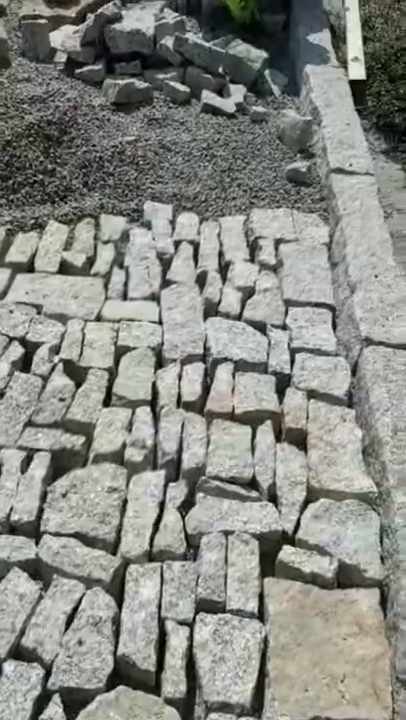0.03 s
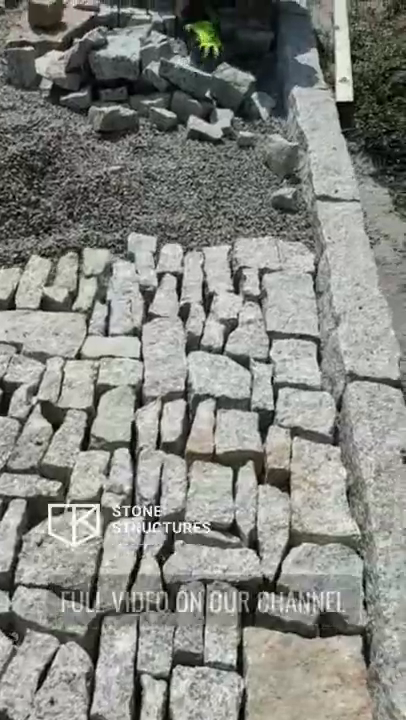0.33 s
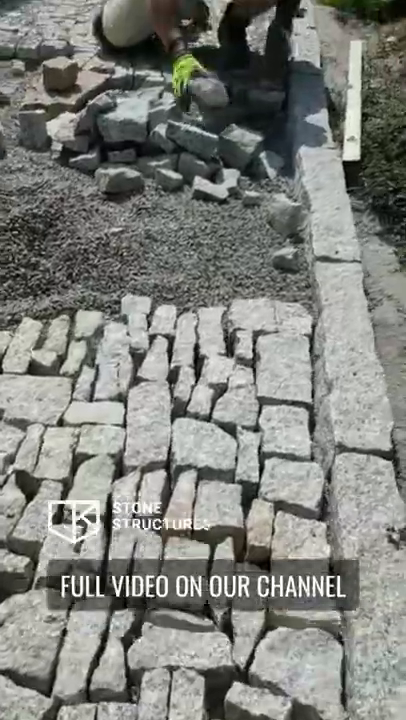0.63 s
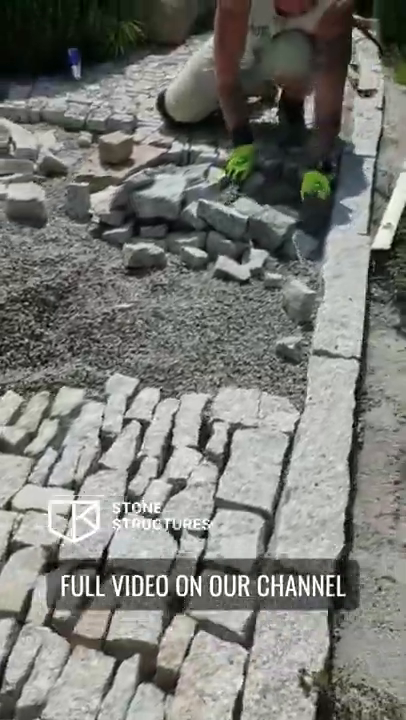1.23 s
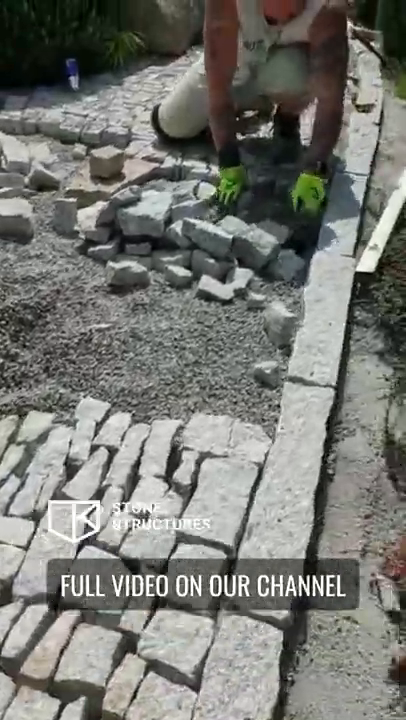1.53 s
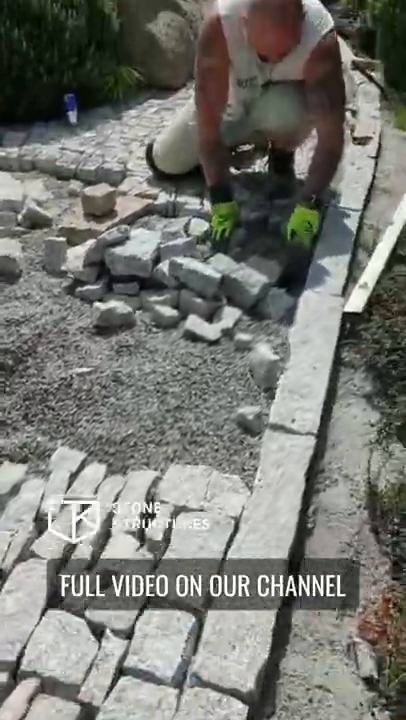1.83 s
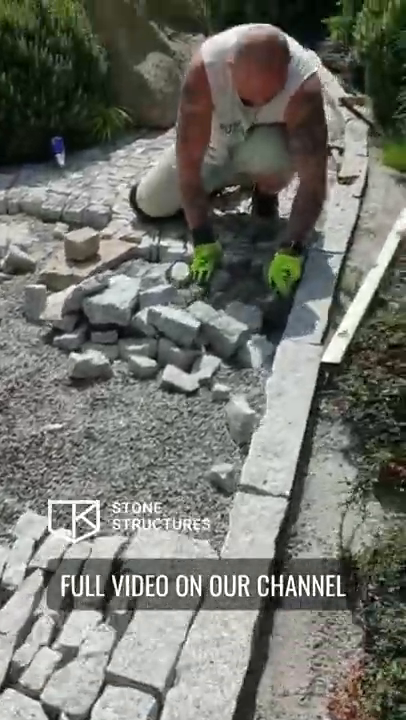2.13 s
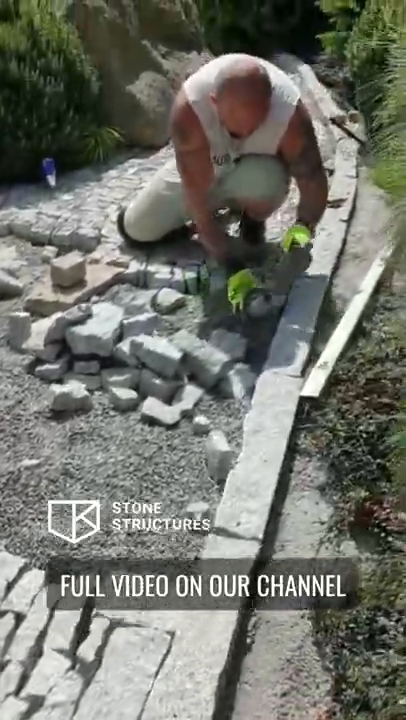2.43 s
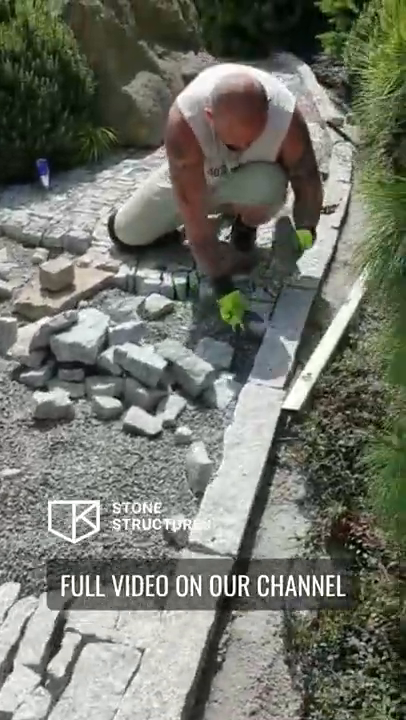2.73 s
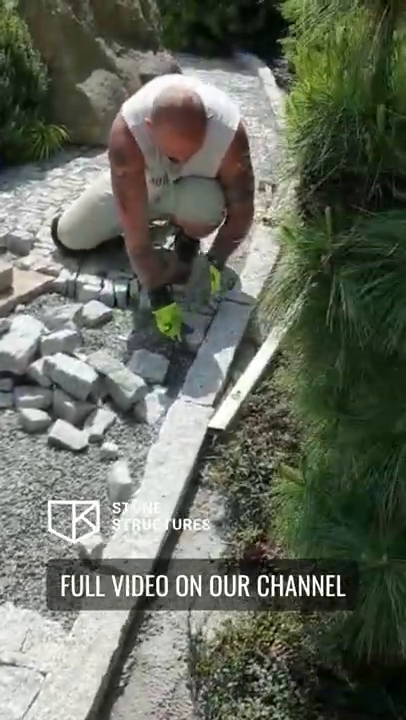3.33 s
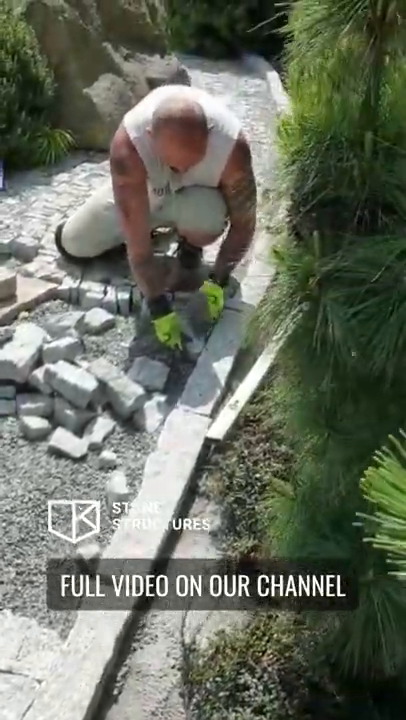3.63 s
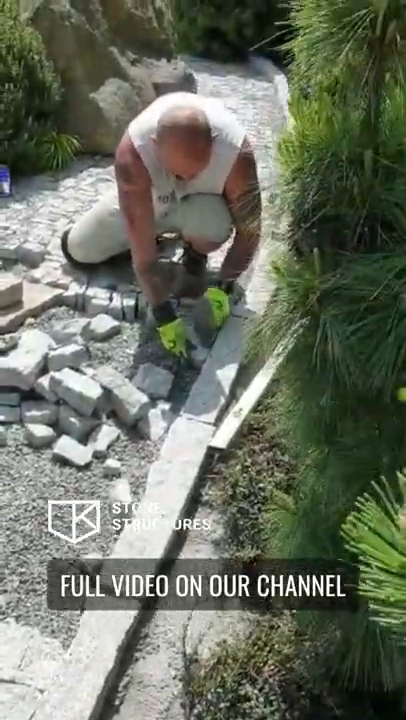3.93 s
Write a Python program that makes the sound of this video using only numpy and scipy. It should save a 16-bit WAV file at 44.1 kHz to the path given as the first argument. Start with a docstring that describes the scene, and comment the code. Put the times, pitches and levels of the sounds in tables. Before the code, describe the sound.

A hammer taps a paving stone five times, after stone knocks and faint gravel scrapes.

```python
"""A garden path, where a paver kneels at work. Granite setts knock together twice, pebbles click, and the
blade of his hammer scrapes and ticks in the gravel. Then five blows tap a stone home, each a hard crack
with ringing steel and crumbling grit, in a short garden echo. Close by, mostly on the right, something
rustles softly and snaps twice; an engine chugs far off and light gusts buffet the microphone."""
import sys
import numpy as np
from scipy import signal
from scipy.io import wavfile
from scipy.ndimage import uniform_filter1d

SR = 44100
rng = np.random.default_rng(int(sys.argv[2]) if len(sys.argv) > 2 else 0)


def master(y):
    """Save y as 16-bit WAV."""
    cut = np.clip(np.atleast_2d(y).T, -1, 1)
    pcm = np.round(cut * 32767)  # scale
    wavfile.write(sys.argv[1], SR, pcm.astype(np.int16))


N = 176400
T = np.arange(N) / SR
HIT_T = T[:8192]  # time axis of one hit
LOW_CUT_HZ = 540  # small stones radiate no bass

# spectrum of a hard contact on stone: f/Hz, level/dB
STONE_CONTACT = [(100, 9), (400, 0), (650, -9), (1700, -4), (2600, -9.5), (3800, -12), (4600, -7),
                 (5900, -11), (7000, -16.5), (10000, -16), (16000, -19)]
# placement of the close sounds, treble to the right: f/Hz, left minus right/dB
CLOSE_PAN = [(200, 0), (2000, 3), (6000, -9), (14000, -12.5)]


def hammer(level_db=-14, note_t60=0.02, clack_t60=0.019, crumble_t60=0.17):
    """Steel cracks on the sett, which clacks and thumps into its bed; the head rings and grit crumbles."""
    # blows: t/s, level/dB, low note/Hz, its level/dB, middle note/Hz, its level/dB, clack/Hz,
    # its level/dB, steel ring/dB, treble/dB, crack t60/s, grit/dB
    blows = [(3.0537, -5.5, 1466, -8, 2250, -2, 2605, -2.5, -3.5, -4, 0.019, -23),
             (3.2555, -6.5, 960, -15, 1690, -7, 2640, 1.5, -1, 2, 0.0094, -9),
             (3.486, -8.5, 1000, -5, 2540, -3.5, 2860, -2, -3, 2, 0.019, -13.5),
             (3.7131, -6, 1213, -5, 3290, -10.5, 2630, -1.5, -9.5, -5, 0.019, -19.5),
             (3.9448, -5.5, 716, -7.5, 1245, -10.5, 2766, 0, -1.5, -2, 0.014, -24)]
    sett_modes = [(925, -14.5, 0.03), (1195, -15.5, 0.054), (1790, -14.5, 0.023), (2110, -18.5, 0.022),
                  (3120, -21, 0.0058)]  # the struck stone: f/Hz, level/dB, t60/s
    seat_modes = [(598, -12.5, 0.022), (162, -19.5, 0.019)]  # its thump into the bed: f/Hz, level/dB, t60/s
    head_modes = [(4080, -16, 0.038), (5070, -21, 0.063), (5574, -9.5, 0.018), (5800, -17, 0.017),
                  (7530, -15.5, 0.018), (8260, -7, 0.033), (9820, -24, 0.13), (12150, -28, 0.056),
                  (14900, -20, .03)]  # the hammer head: f/Hz, level/dB, t60/s
    crack_spectrum = [(100, -41), (430, -22.5), (560, 6), (850, -3), (1600, 5.5), (2900, -1), (3400, 4),
                      (3800, -6), (5600, 0), (6800, -13.5), (9500, -13.5), (12000, -23.5), (16000, -19)]  # steel on stone: f/Hz, level/dB
    crumble_spectrum = [(300, -32), (900, 3), (2600, 2), (3700, 2), (5500, 2), (6800, -7), (10000, -5),
                        (13000, -12), (16000, -15)]  # grit under the hammer: f/Hz, level/dB
    placement = [(100, 1), (700, 0), (1400, -2.5), (2300, -1), (5000, -6), (8000, -4.5), (15000, -6.5)]  # f/Hz, left minus right/dB
    out = np.zeros((2, N))
    for (s, db, low_hz, low_db, mid_hz, mid_db, clack_hz, clack_db,
         steel_db, treble_db, t60, grit_db) in blows:
        modes = [(low_hz, low_db, note_t60), (mid_hz, mid_db, clack_t60), (clack_hz, clack_db, clack_t60)]
        notes = ring(modes, apart=0.37)
        stone = ring(sett_modes, scatter=0.025) + notes + ring(seat_modes, apart=0.048)
        contact = brighten(crack(crack_spectrum, t60, spike=6, alike=.7, hold_s=0.0039), treble_db)
        steel = amp(steel_db) * ring(head_modes, scatter=0.0064)
        crumble = amp(grit_db) * crumbs(crumble_spectrum, crumble_t60)
        add(out, s, amp(db + level_db) * (contact + stone + steel + crumble))
    return pan(out, placement)


def knocks(level_db=-14, note_t60=0.03, crumble_t60=0.12):
    """One sett lands on another: an edge bites, two notes ring, the bed thuds and sand is crushed."""
    # landings: t/s, level/dB, low note/Hz, its level/dB, high note/Hz, its level/dB, treble/dB,
    # crack t60/s, bite/dB, grit/dB
    landings = [(0.038, -7.5, 820, -1.5, 1070, -4.5, -4, 0.014, 10.5, -14),
                (0.8223, -10, 1226, -8.5, 1550, -6.5, -7, 0.041, -5.5, -16.5)]
    bite_corners = [3800, 4000, 5700, 6800]  # band where a sharp edge bites: f/Hz
    thud_modes = [(207, -18, 0.031), (1590, -8, 0.0095)]  # the bed gives, the next stone clacks: f/Hz, level/dB, t60/s
    sand_spectrum = [(300, -20), (1500, 2), (3000, 7.5), (6000, -6), (10000, -5), (14000, 0), (16000, -11)]  # sand between the setts: f/Hz, level/dB
    out = np.zeros((2, N))
    for s, db, low_hz, low_db, high_hz, high_db, treble_db, t60, bite_db, grit_db in landings:
        notes = ring([(low_hz, low_db, note_t60), (high_hz, high_db, min(t60, note_t60))], apart=0.14)
        contact = brighten(crack(STONE_CONTACT, t60, spike=6, alike=.6, hold_s=0.0039), treble_db)
        contact = colour(contact, list(zip(bite_corners, (0, bite_db, bite_db, 0))))
        thud = ring(thud_modes)
        sand = amp(grit_db) * crumbs(sand_spectrum, crumble_t60)
        add(out, s, amp(db + level_db) * (contact + low_cut(notes, order=2) + thud + sand))
    return out * amp([[-.7], [.7]])


def clicks(level_db=-14):
    """Pebbles and stone edges click, and the steel hammer ticks once in the gravel."""
    # small contacts, the hammer's tick at 2.28 s: t/s, level/dB, note/Hz, its level/dB, treble/dB, t60/s
    hits = [(.397, -27, 1120, -15.5, -17, 0.031), (0.9204, -19.5, 1520, -21, -14.5, 0.029),
            (.984, -19.5, 1490, -13, -12.5, 0.086), (1.002, -22, 1030, -17, -23, 0.032),
            (1.199, -33, 870, -4, -19, 0.053), (1.228, -27, 390, -4, -11, 0.03),
            (1.376, -32.5, 800, 3.5, -14, 0.044), (1.472, -23, 2300, -7.5, -27, 0.024),
            (1.497, -28, 2340, -5, -9, 0.022), (1.625, -42.5, 2180, 7.5, 16, 0.03),
            (1.652, -35, 815, 2, 15.5, 0.12), (2.126, -35.5, 2170, -2, 21, 0.085),
            (2.282, -33, 2275, 14, 13, 0.045), (2.284, -34, 2670, 15.5, -28, 0.013),
            (2.649, -30.5, 1159, -25, -2, .04)]
    out = np.zeros((2, N))
    for s, db, hz, note_db, treble_db, t60 in hits:
        contact = brighten(crack(STONE_CONTACT, t60, spike=3.6, alike=0.43), treble_db)
        add(out, s, amp(db + level_db) * (contact + ring([(hz, note_db, t60)])))
    return out * amp([[-.7], [.7]])


def gravel(wander_s=0.000244):
    """Chippings tick against the ploughing blade and shift its ring; stones shuffle in their bed."""
    # blade strokes: t/s, rise/s, hold/s, release/s, level/dB, steel ring/dB, treble/dB
    scrapes = [(1.255, 0.013, 0.016, 0.031, -43, -3, 7.5), (1.301, 0.078, 0.097, 0.088, -43.5, -2.5, -1.5),
               (1.648, 0.016, 0.046, 0.09, -36.5, -4, -10), (1.732, 0.013, 0.028, 0.14, -39, -30, -6),
               (1.862, 0.0077, 0.011, 0.046, -41, -6, -15), (1.916, 0.0075, 0.011, 0.052, -34, -3.5, -0.5),
               (2.122, 0.0086, 0.024, 0.042, -39, 2.5, 6), (2.254, .01, 0.047, 0.15, -42.5, -19, -22)]
    chip_spectrum = [(200, 4.5), (750, 0), (1400, -3.5), (1850, -1), (2280, -1.5), (3100, -6), (4700, -6.5),
                     (7000, -4), (10000, -2.5), (12500, 2), (16000, 1.5)]  # scraped chippings: f/Hz, level/dB
    blade_modes = [(2220, 0, 0.026), (2610, -6.5, 0.0061), (4520, -7, 0.019), (5900, -10, 0.0084),
                   (8200, -4.5, 0.021), (11900, -4.5, 0.0058)]  # steel damped by gravel: f/Hz, level/dB, t60/s
    shuffles = [(0.439, 0.12, 0.19, 0.028, -45), (0.736, 0.04, .27, 0.23, -52),
                (1.115, 0.025, 0.04, 0.093, -55)]  # stones shifting: t/s, rise/s, hold/s, release/s, level/dB
    bed_spectrum = [(150, 4), (700, 0.5), (2200, 0), (3400, -10), (6300, -2), (7500, -11), (16000, -6.5)]  # their crunch: f/Hz, level/dB
    placement = [(100, -3), (700, -1.5), (1500, -5.5), (2500, -0.5), (5000, -11), (8000, -0.5), (15000, -7)]  # f/Hz, left minus right/dB
    grains = grit(per_s=4500, spread_db=3.5, clump_db=1.5, alike=.5)
    chips = steadied(patchy(colour(grains, chip_spectrum), patch_db=4))
    steel = signal.fftconvolve(grains, ring(blade_modes), axes=1)[:, :N]
    steel = steadied(wandering(steel, wander_s))
    scraping = 0
    for *shape, db, ring_db, treble_db in scrapes:
        crunch = colour(chips, [(5000, 0), (12000, treble_db)])
        scraping += amp(db) * stroke(*shape) * (crunch + amp(ring_db) * steel)
    bed_grains = grit(per_s=4000, spread_db=2.5, clump_db=2.5, alike=0.17)
    bed = unit_rms(colour(patchy(bed_grains, patch_db=3.5), bed_spectrum))
    shuffling = bed * sum(amp(db) * stroke(*shape) for *shape, db in shuffles)
    return pan(scraping + shuffling, placement)


def rustle():
    """Dense, tiny ticks merge into a fine, bright rustle close to the microphone."""
    spectrum = [(200, 17), (900, -3.5), (3000, 3), (6200, 8.5), (7500, 3.5), (11000, 4), (14500, 7.5),
                (16000, -9.5)]  # tone of the rustle: f/Hz, level/dB
    swells = [(0, -93), (.46, -57.5), (.56, -46), (.7, -47.5), (.77, -63), (.9, -58.5), (1.08, -55.5),
              (1.27, -46.5), (1.56, -58.5), (1.77, -48.5), (2.08, -54.5), (2.2, -49.5), (2.33, -47),
              (2.45, -56), (2.54, -62), (2.63, -58), (2.7, -47), (2.8, -46.5), (2.91, -51), (3.03, -52),
              (3.2, -59.5), (3.4, -68), (4, -65)]  # its envelope: t/s, level/dB
    grains = grit(per_s=20000, spread_db=2, clump_db=.8, alike=.7)
    fizz = unit_rms(colour(patchy(grains, patch_db=1.6), spectrum))
    return pan(fizz * amp(curve(swells)), CLOSE_PAN)


def snaps():
    """Dry, bright snaps right beside the microphone."""
    hits = [(2.9588, -30.5, 0.036), (3.23, -46, 0.023)]  # t/s, level/dB, t60/s
    spectrum = [(500, -17), (3000, -19), (6000, -11), (10000, -9), (16000, -1.5)]  # tone of a snap: f/Hz, level/dB
    out = np.zeros((2, N))
    for s, db, t60 in hits:
        add(out, s, amp(db) * crack(spectrum, t60, spike=2.6))
    return pan(out, CLOSE_PAN)


def engine(uneven_db=1.5, echo_s=0.01229, echo_db=-4):
    """A far single-cylinder engine idles: one exhaust puff per firing, thrown back by a wall."""
    firing_rate = [(0, 17.7), (1, 17.3), (1.7, 17.5), (2.3, 18.1), (2.7, 17.1), (3.05, 17), (3.3, 18.1),
                   (4, 17.9)]  # t/s, rate/Hz
    puff_spectrum = [(20, -49.5), (52, -6.5), (70, -18), (88, 0), (106, 1.5), (128, -4), (168, -4),
                     (195, -11.5), (218, -5), (245, -21.5), (295, -14), (370, -32.5), (700, -60.5)]  # one exhaust puff: f/Hz, level/dB
    swell = [(0, -134), (.04, -51), (1.2, -49), (2.1, -44.5), (2.8, -42), (3.3, -41), (4, -44)]  # envelope of the chug: t/s, level/dB
    cycles = np.cumsum(curve(firing_rate)) / SR - 1 / 3
    firings = np.diff(np.floor(cycles), prepend=-1) * amp(uneven_db * rng.standard_normal(N))
    puffs = colour(firings[None], puff_spectrum, size=16384)
    chug = puffs + amp(echo_db) * np.interp(T - echo_s, T, puffs[0])
    return unit_rms(chug) * amp(curve(swell)) * amp([[.7], [-.7]])


def air():
    """Outdoor ambience: a wide wash of low rumble and faint hiss."""
    spectrum = [(12, -46), (20, -45), (43, -6.5), (135, -13), (169, -16.5), (229, -18), (302, -17),
                (387, -28.5), (1420, -27.5), (2100, -34), (6530, -37), (7930, -41), (9370, -33),
                (15000, -60)]  # tone of the wash: f/Hz, level/dB
    swell = [(0, -101), (.025, -96), (.04, -47.5), (1.5, -48.5), (2.6, -46), (4, -48)]  # its envelope: t/s, level/dB
    placement = [(50, 3.5), (200, 0), (1000, -1.5), (15000, 1.5)]  # f/Hz, left minus right/dB
    wash = unit_rms(colour(stereo_noise(N, alike=0.58), spectrum))
    return pan(wash, placement) * amp(curve(swell))


def gusts():
    """Eddies buffet each side of the microphone, harder on the left."""
    puffs = [(0.636, 0.035, 0.034, 0.082, -51), (1.266, 0.019, 0.017, 0.13, -35.5),
             (1.393, 0.16, 0.016, 0.2, -33), (1.682, 0.051, 0.093, 0.33, -35),
             (2.304, 0.06, 0.2, 0.73, -39), (2.617, 0.033, 0.015, 0.13, -36)]  # t/s, rise/s, hold/s, release/s, level/dB
    spectrum = [(15, -45), (35, -23.5), (58, -1.5), (100, -13), (180, -27.5), (400, -43), (1200, -69)]  # wind rumble: f/Hz, level/dB
    eddies = colour(stereo_noise(N, alike=0.33), spectrum)
    eddies /= np.sqrt(uniform_filter1d(eddies ** 2, size=3000, axis=1) + 1e-12)
    return eddies * sum(amp(db) * stroke(*shape) for *shape, db in puffs) * amp([[3], [-6]])


def garden(x, near_db=-18, near_t60=0.19, far_db=-29, far_t60=1.0, delay_s=0.0035):
    """Adds short scatter from paving and kerb, and a faint tail from walls and shrubs."""
    echo_tone = [(100, -29), (650, -0.5), (1200, 6), (3000, -1.5), (5500, 4.5), (7000, -1), (8200, -6),
                 (10000, -2), (16000, 8)]  # f/Hz, gain/dB
    t = T[:SR // 2]
    onset = np.clip(t / delay_s - 1, 0, 1)
    echo = 0
    for db, t60 in ((near_db, near_t60), (far_db, far_t60)):
        tail = stereo_noise(len(t), alike=0.11) * onset * fade(t, t60)
        echo += amp(db) * tail / np.linalg.norm(tail[0])
    return x + signal.fftconvolve(x, colour(echo, echo_tone), axes=1)[:, :N]


def crack(spectrum, t60, spike, alike=0.37, hold_s=0):
    """The spike of a sharp contact, then a dense, dying scatter of noise."""
    burst = stereo_noise(len(HIT_T), alike) * fade(np.maximum(HIT_T - hold_s, 0), t60)
    burst[:, 0] += spike
    return unit_hit(colour(low_cut(burst, order=4), spectrum))


def ring(modes, scatter=0, apart=0.3):
    """Damped modes, detuned at random by `scatter` and set out of phase between the ears by `apart`."""
    out = 0
    for hz, db, t60 in modes:
        detune, left, right = rng.uniform(-0.46, 1, 3)
        phase = 2 * np.pi * hz * (1 + scatter * detune) * HIT_T + apart * np.pi * np.array([[left], [right]])
        mode = np.sin(phase) * fade(HIT_T, t60) * np.minimum(HIT_T * hz, 1)
        out += amp(db) * rng.choice([-1, 1]) * unit_hit(mode)
    return out


def crumbs(spectrum, t60, per_s=4500):
    """Separate grains break and scatter after a blow."""
    sizes = rng.exponential(1, len(HIT_T)) ** .5 * (rng.random(len(HIT_T)) < per_s / SR)
    return unit_hit(colour(stereo_noise(len(HIT_T), alike=1.0) * sizes * fade(HIT_T, t60), spectrum))


def grit(per_s, spread_db, clump_db, alike):
    """Tiny impacts of very unequal size that come in clumps."""
    sizes = amp(spread_db * np.minimum(rng.exponential(1, N), 4)) * (rng.random(N) < per_s / SR)
    clumps = amp(clump_db * drift(400, 200))
    return unit_rms(stereo_noise(N, alike) * sizes * clumps)


def patchy(x, patch_db, bins=7, frames=12):
    """Separate crunches: patches of the spectrum swell and fade on their own."""
    spectra = signal.stft(x, nperseg=256, noverlap=192)[2]
    field = rng.standard_normal(spectra.shape[1:])
    field = unit_rms(uniform_filter1d(uniform_filter1d(field, bins, 0), frames, 1))
    return unit_rms(signal.istft(spectra * amp(patch_db * field), nperseg=256, noverlap=192)[1][:, :N])


def wandering(x, wander_s):
    """A drifting delay bends the pitch up and down."""
    warped = T + wander_s * drift(700, 700)
    return np.array([np.interp(warped, T, side) for side in x])


def steadied(x, size=900):
    """Takes out slow swells and leaves the fine grain."""
    return x / np.sqrt(abs(uniform_filter1d((x ** 2).mean(0), size)) + 1e-12)


def drift(first, second):
    """Slow random motion: noise smoothed over two lengths in samples."""
    return unit_rms(uniform_filter1d(uniform_filter1d(rng.standard_normal(N), first), second))


def stereo_noise(count, alike):
    """Left and right white noise with correlation `alike`."""
    a, b = rng.standard_normal((2, count))
    return np.array([a, alike * a + np.sqrt(1 - alike * alike) * b])


def colour(x, points, size=4096):
    """Minimum-phase EQ through (f/Hz, gain/dB) points on a log-frequency axis."""
    hz, db = np.transpose(points)
    bin_hz = abs(np.fft.fftfreq(size, 1 / SR))
    log_gain = np.log(amp(np.interp(np.log(bin_hz + 1), np.log(hz + 1), db)))
    taps = np.fft.ifft(np.exp(np.conj(signal.hilbert(log_gain)))).real[:size // 2]
    return signal.fftconvolve(x, taps[None], axes=1)[:, :x.shape[1]]


def brighten(x, treble_db, from_hz=940, full_hz=4700):
    """High shelf: a harder contact has more treble."""
    return colour(x, [(from_hz, 0), (full_hz, treble_db)])


def low_cut(x, order):
    """Thins out the bass of a hit."""
    return signal.sosfilt(signal.butter(order, LOW_CUT_HZ, "high", fs=SR, output="sos"), x)


def pan(x, points):
    """Shares each frequency between left and right."""
    left = colour(x[:1], [(hz, db / 2) for hz, db in points])
    right = colour(x[1:], [(hz, -db / 2) for hz, db in points])
    return np.vstack([left, right])


def stroke(s, rise, hold, release):
    """Rise, hold and a release that falls 20 dB in its time."""
    return np.clip((T - s) / rise, 0, 1) * 10 ** (-np.maximum(T - s - rise - hold, 0) / release)


def fade(t, t60):
    """Decay of 60 dB in t60."""
    return np.exp(-np.log(1000) * t / t60)


def curve(points):
    """Joins timed points by straight lines."""
    return np.interp(T, *np.transpose(points))


def amp(db):
    """Decibels to gain."""
    return 10 ** (np.asarray(db) / 20)


def unit_rms(x):
    """Scales to rms 1."""
    return x / np.sqrt(np.mean(x ** 2) + 1e-20)


def unit_hit(x):
    """Gives a hit the energy of 10 ms at rms 1."""
    return unit_rms(x) * np.sqrt(SR / 100 / x.shape[-1])


def add(mix, s, sound):
    """Mixes a sound in at its time."""
    part = mix[:, round(s * SR):][:, :sound.shape[1]]
    part += sound[:, :part.shape[1]]


def scene():
    """The stonework in its garden echo, with the close sounds dry, over the background."""
    work = hammer() + knocks() + clicks() + gravel()
    return garden(work) + rustle() + snaps() + engine() + air() + gusts()


def record(dry):
    """Soft overload on the highest peaks, then a steep low-pass at 15.9 kHz."""
    rounded = dry / (1 + dry ** 6) ** (1 / 6)
    low_pass = signal.firwin(401, 15900, window=("kaiser", 8), fs=SR)
    return signal.oaconvolve(rounded, low_pass[None], "same")


dry = scene()
out = record(dry)
master(out)
```